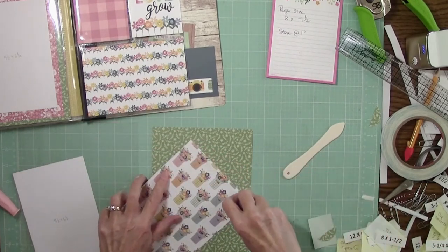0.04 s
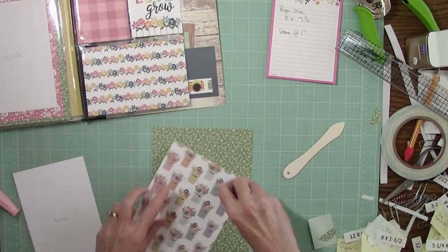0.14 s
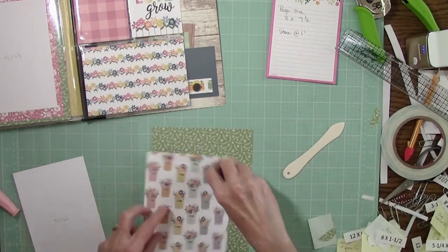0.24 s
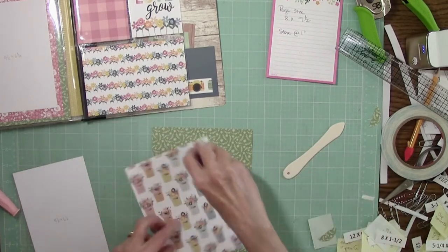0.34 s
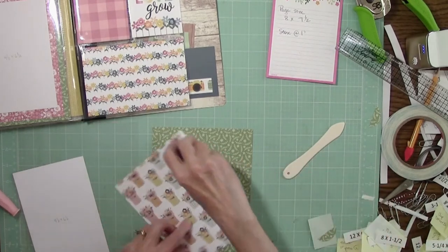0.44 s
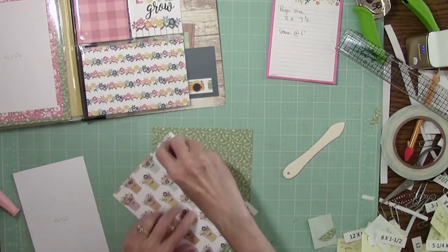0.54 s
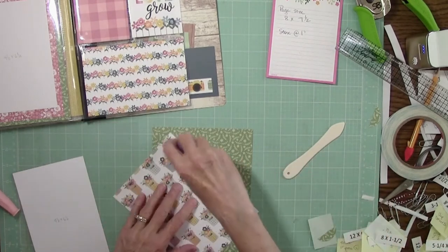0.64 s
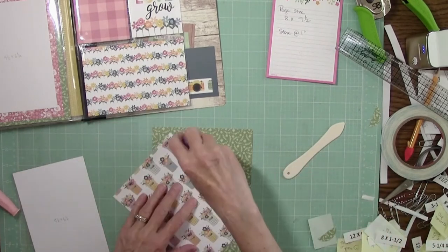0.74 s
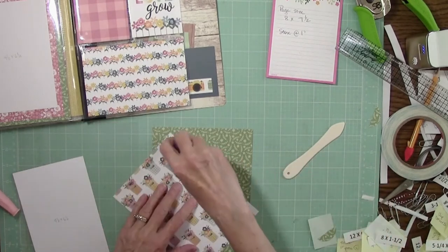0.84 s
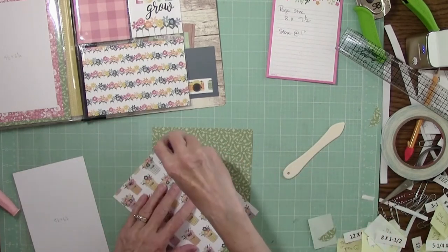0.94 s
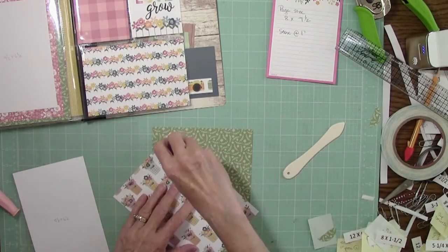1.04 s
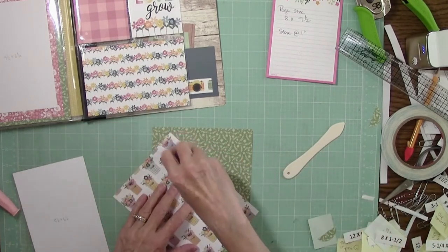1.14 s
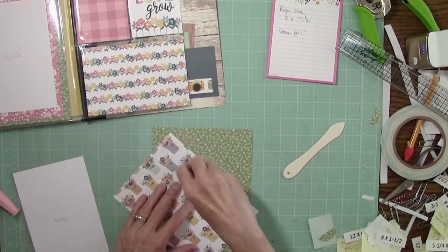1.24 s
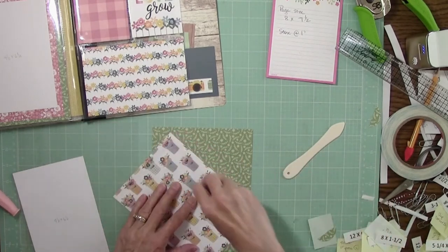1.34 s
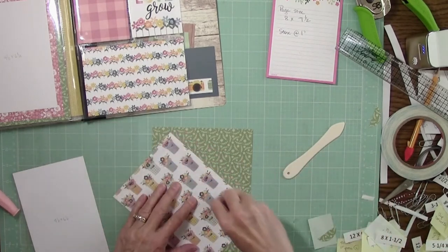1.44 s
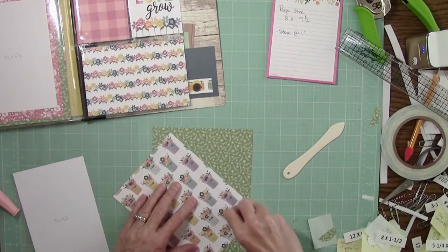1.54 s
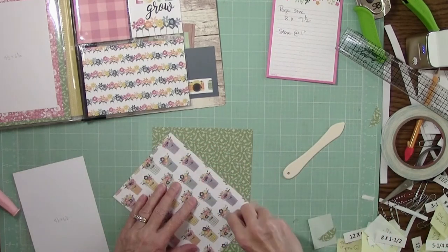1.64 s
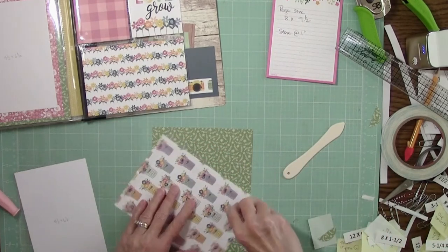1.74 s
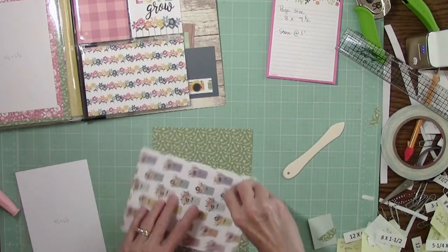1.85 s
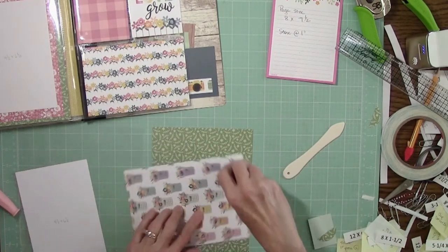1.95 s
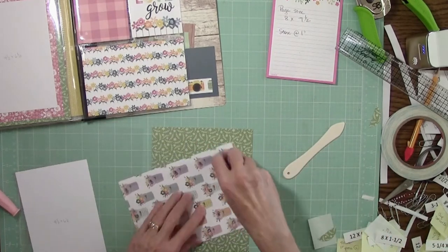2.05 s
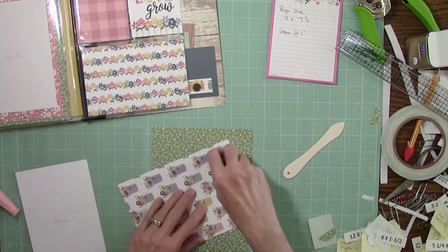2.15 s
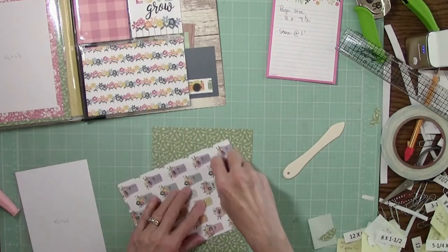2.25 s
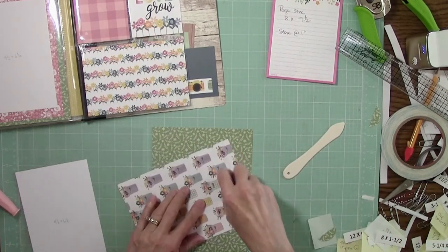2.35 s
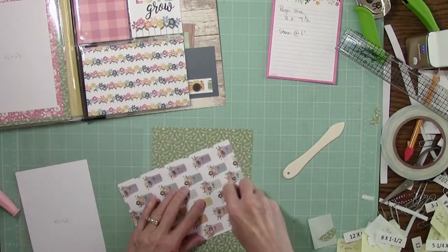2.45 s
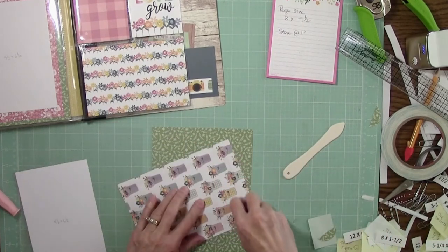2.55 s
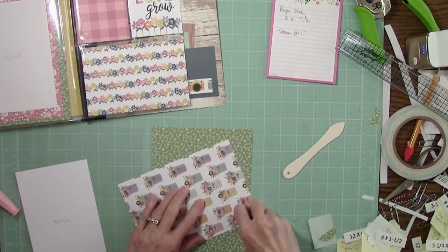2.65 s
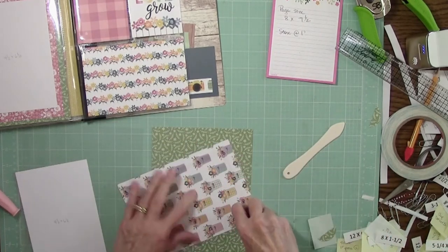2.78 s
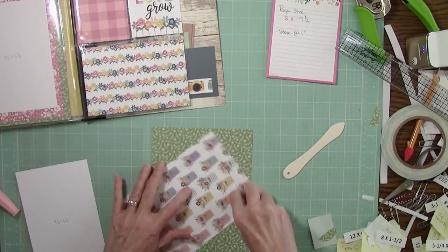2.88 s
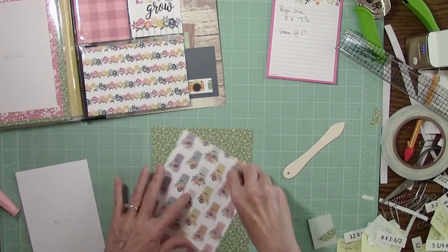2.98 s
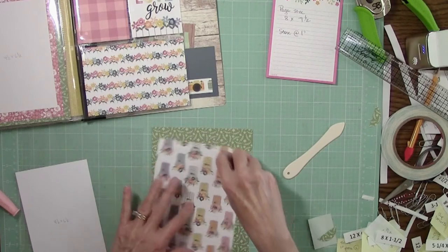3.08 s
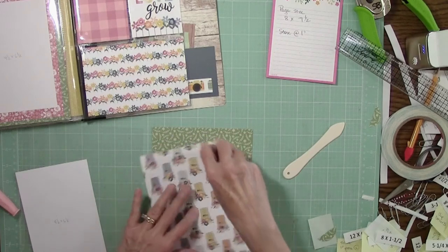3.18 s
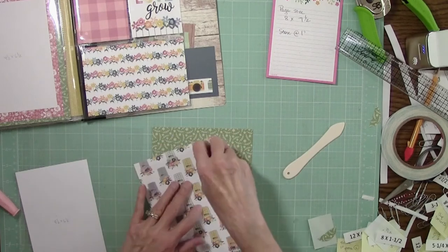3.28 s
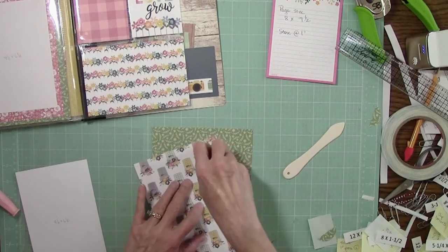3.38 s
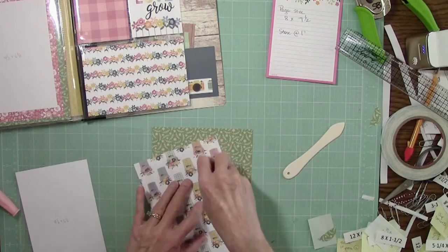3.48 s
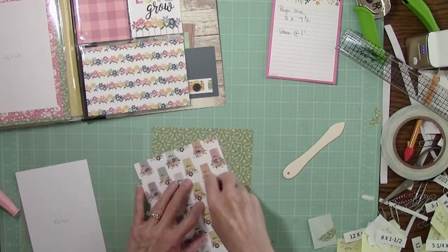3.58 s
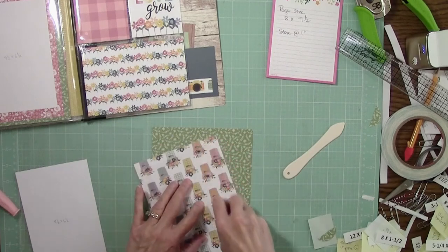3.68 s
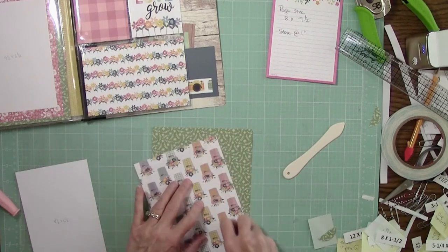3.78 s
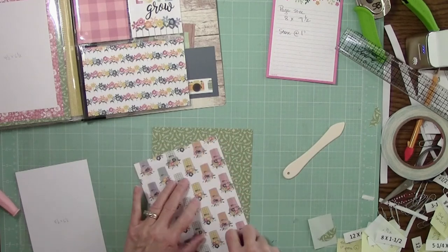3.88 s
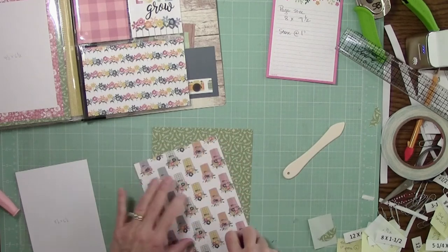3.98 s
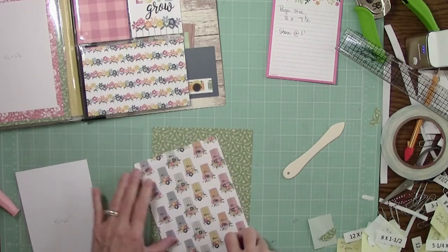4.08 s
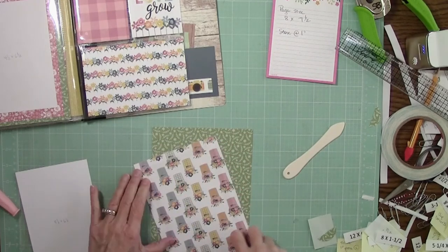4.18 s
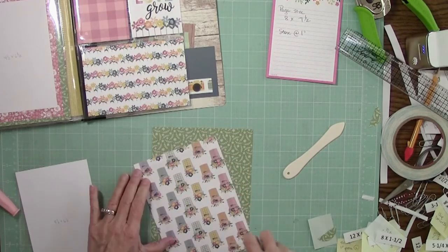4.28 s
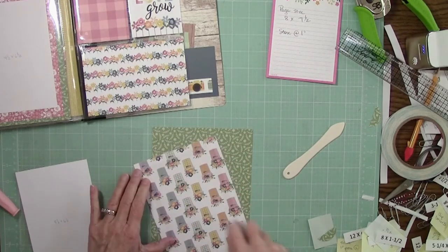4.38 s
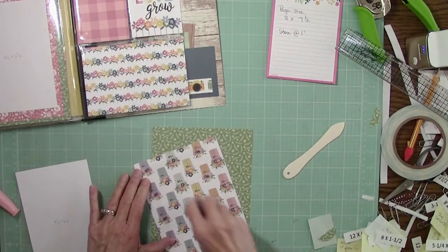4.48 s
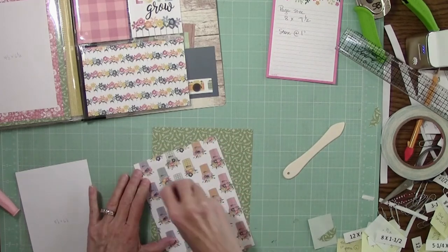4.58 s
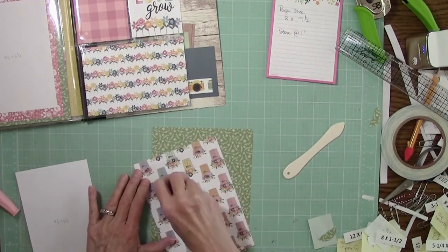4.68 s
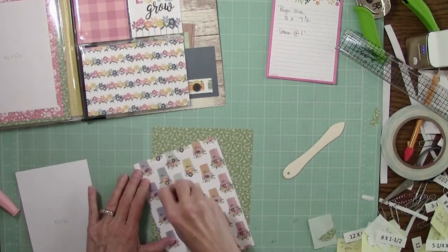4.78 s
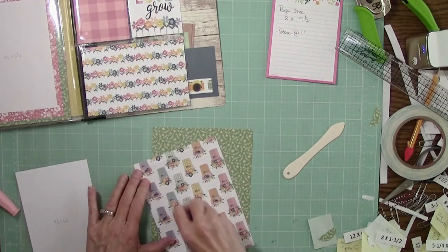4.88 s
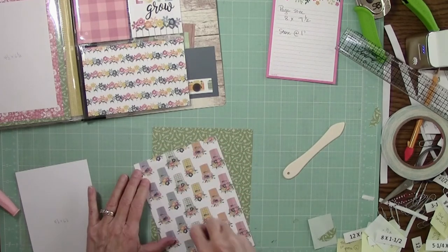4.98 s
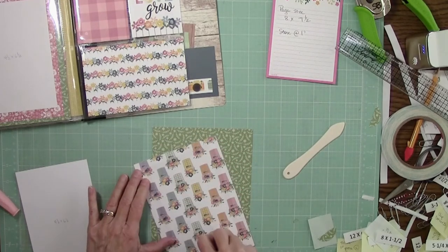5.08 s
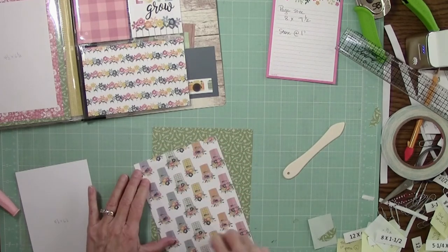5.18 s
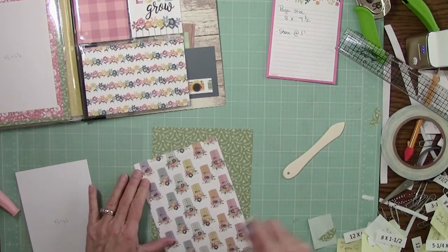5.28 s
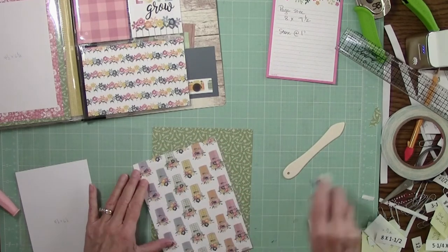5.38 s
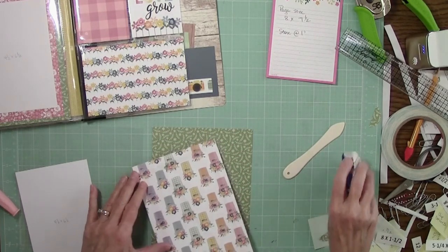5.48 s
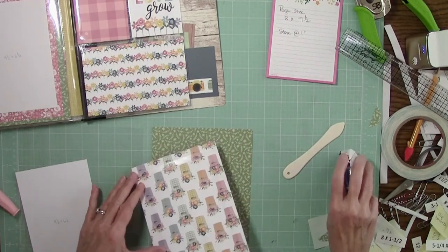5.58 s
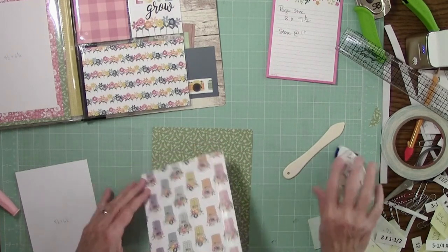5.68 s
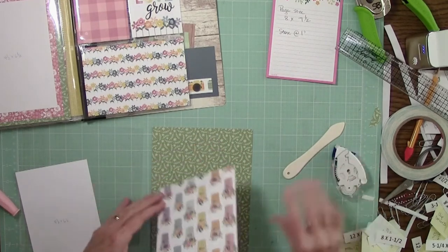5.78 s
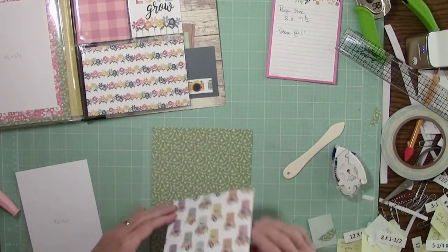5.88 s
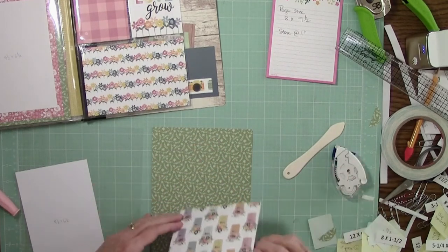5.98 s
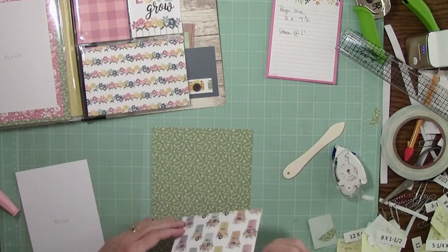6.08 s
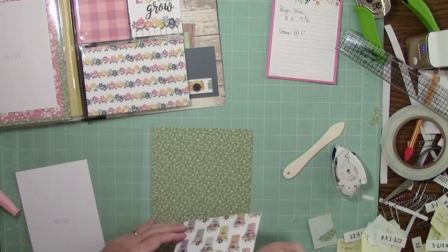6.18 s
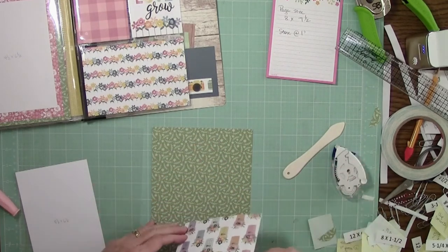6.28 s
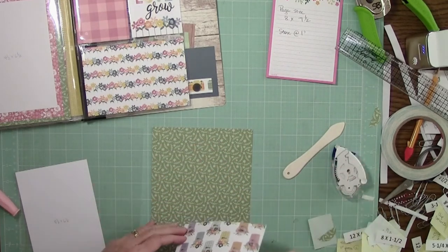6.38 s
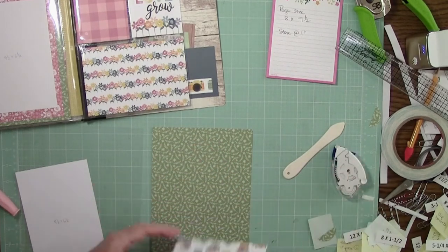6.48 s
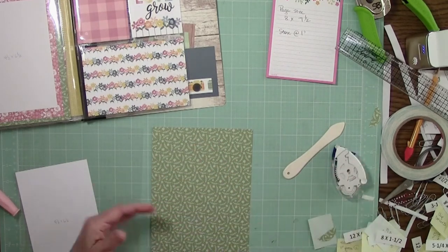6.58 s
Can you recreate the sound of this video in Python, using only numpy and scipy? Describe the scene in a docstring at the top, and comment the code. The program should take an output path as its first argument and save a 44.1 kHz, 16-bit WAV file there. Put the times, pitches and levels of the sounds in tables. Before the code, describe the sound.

A small, quiet room with faint low air and hum, heard close and nearly mono. From 0 to 0.7 s card slides over a mat with soft papery hiss, a sharp tick at 0.3 and smaller ticks. Slight touches at 1.0 lead to the first tape-runner stroke, 1.1-1.65 s: a fast ratcheting buzz, nasal and hollow, rising slightly, with crisp tape peeling above. Card swivels with a bright snap at 1.84 and a hiss. Second stroke 2.25-2.7, a little softer; papery sliding 2.8-3.3 with a snap at 2.95. Third stroke 3.45-3.95 ends in a tooth click. Quieter handling, with clustered ticks at 4.28. Fourth stroke, shorter and stronger, 4.8-5.15, then small ticks. At 5.62 the plastic runner lands with a loud crack and rattle, tipping over with another clack at 5.79. The background then seems slightly subdued; soft contact at 6.16, card knocks at 6.45 and 6.55.

```python
"""Adhesive tape runner on card

A tape runner is drawn four times along the edges of a card on a craft mat; between strokes the card is swivelled.
Ratchet pushes ring the runner's shell resonances; tape peels as filtered clicks; the card hisses, rubs and ticks.
The runner is set down and tips over, then the card is lifted and tapped: noise bursts through crack, rattle,
card and table filters. A small room, faint air and hum, a nearly mono microphone, a slowly recovering limiter.
"""
import sys
import numpy as np
from scipy import signal
from scipy.fft import rfft, irfft
from scipy.io import wavfile
from scipy.ndimage import uniform_filter1d, minimum_filter1d

SR = 44100
rng = np.random.default_rng(int(sys.argv[2]) if len(sys.argv) > 2 else 0)


def unload_wav(signal):
    """Save mono or channel-first audio to the path in sys.argv[1] as 16-bit WAV at rate SR, clipped to [-1, 1]."""
    wavfile.write(
        sys.argv[1],
        SR,
        np.round(np.clip(np.atleast_2d(signal).T, -1, 1) * 32767).astype(np.int16),
    )


N = 292427
T = np.arange(N) / SR

# Levels are at the source, before the output gains and limiter; spectra are relative.
# Half-widths of bell-shaped swells run to 1/e.
# runner strokes: (start [s], run-up [s], slowing from [s], slowing [dB/s], level [dB],
#                  peel over level [dB], main shell resonance at mid-stroke [Hz])
STROKES = [(1.118, .15, 1.601, 135, -25, -4, 1424), (2.235, 0.12, 2.665, 230, -27.5, -3.5, 1400),
           (3.425, .17, 3.92, 173.5, -25, -2.5, 1443), (4.81, .09, 5.115, 222.5, -23, -3.5, 1414)]
# runs of lone ratchet teeth: (first tooth [s], end [s], first gap [s], peak [dB], upper modes over main [dB])
TOOTH_RUNS = [(1.152, 1.196, 0.013, -14.5, 1), (2.257, 2.27, .03, -20, 8), (3.457, 3.51, .0215, -15, 3),
              (3.953, 3.968, .009, -14.5, 9), (5.137, 5.155, 0.013, -28, 1)]
# shell modes above the main one: (centre [Hz], nominal width [Hz], level [dB])
SHELL_MODES = [(1770, 300, -7), (2023, 520, -8), (2660, 370, -5.5), (2720, 260, -4), (3180, 410, 1),
               (3594, 250, -1), (4126, 270, -4.5), (4630, 390, -13.5), (5910, 320, -9), (7540, 300, -8.5),
               (9160, 220, -10.5)]
# main resonance flare-ups: (centre [s], half-width [s], pitch [Hz], level [dB])
SINGS = [(1.183, 0.026, 1347, -28), (1.58, 0.018, 1523, -23), (2.346, 0.038, 1360, -23),
         (2.62, 0.03, 1368, -27.5), (3.874, 0.033, 1503, -24), (4.949, 0.017, 1452, -15.5)]
# nose biting harder: (centre [s], half-width [s], added rasp against the usual [dB])
BITES = [(1.32, 0.057, -14), (2.626, 0.037, -4), (3.55, 0.051, -10), (3.81, 0.061, -2), (5.08, 0.022, -13)]
# peeling tape spectrum: (frequency [Hz], level [dB])
PEEL_SPECTRUM = [(2650, -35.5), (4500, -16), (5300, 0.5), (5810, -12), (6560, 0), (7650, 1), (9360, 1),
                 (14800, -6), (16000, -32)]
# card pushed over the mat: (start [s], run-up [s], slowing from [s], slowing [dB/s], hiss [dB], low rub [dB])
SLIDES = [(-.02, .02, 0.0085, 220, -37.5, -28), (.09, .08, 0.33, 150, -36, -38.5),
          (.27, 0.16, 0.48, 86, -29.5, -37.5), (1.765, 0.066, 1.984, 48, -31.5, -37.5),
          (2.8, .2, 3.32, 241, -35.5, -41.5), (5.31, .1, 5.26, 150, -52.5, -46)]
# paper fibre hiss spectrum: (frequency [Hz], level [dB])
HISS_SPECTRUM = [(2650, -26), (4500, -12.5), (5620, -4), (6770, -2), (7410, -1.5), (7980, -1), (11600, -7),
                 (14000, -15), (15200, -12), (16000, -36.5)]
# sheet rub spectrum: (frequency [Hz], level [dB])
RUB_SPECTRUM = [(290, -34), (500, -4.5), (714, -11), (935, -9), (1720, -0.5), (2140, -2.5), (2800, 2.5),
                (4720, -2), (5000, -11), (6500, -28.5), (11000, -120)]
# squeaks and scuffs of card and fingers:
# (centre [s], half-width [s], pitch [Hz], glide [Hz/s], width [Hz], level [dB])
SCUFFS = [(0.218, 0.04, 2800, -2600, 110, -38.5), (0.402, 0.063, 7540, 0, 400, -27.5),
          (2.877, 0.014, 1680, 0, 900, -38.5), (4.213, 0.0085, 2400, 0, 3530, -34.5),
          (5.586, 0.0039, 1810, 0, 600, -34.5), (5.761, 0.017, 3360, 0, 1610, -28),
          (5.766, 0.0031, 2820, -5, 1300, -18), (6.184, 0.015, 680, -2, 447, -34)]
# card corners, nails, runner's nose touching down: (time [s], peak [dB], centre [Hz])
TICKS = [(0.053, -17, 3270), (0.302, -7, 7000), (0.627, -23, 1440), (0.713, -16.5, 5170),
         (1.0133, -20.5, 2180), (1.0849, -26, 2600), (1.8412, -6, 9700), (2.0448, -12, 3200),
         (2.2473, -11.5, 2770), (2.9493, -11, 9100), (3.43, -18.5, 2800), (4.1639, -24, 6200),
         (4.2706, -12.5, 7200), (4.2774, -16, 6600), (4.2834, -14, 7000), (4.2944, -21.5, 2520),
         (4.734, -20, 1360), (5.2497, -17.5, 1358), (5.3793, -18, 1300)]
# runner landing and tipping over: (time [s], crack [dB], crack decay [s], shell mode [Hz],
#                                   rattle [dB], rattle decay [s], rattle low-pass [Hz], table thud [dB])
DROPS = [(5.6198, 7, 0.0017, 3830, -14.5, 0.053, 8200, -14),
         (5.778, -12.5, 0.0029, 2960, -15, .01, 4000, -65),
         (5.7856, 5, 0.0025, 6750, -4, 0.033, 9500, -22.5), (5.835, -40, .003, 6400, -10, 0.053, 5550, -28)]
# hard plastic crack spectrum: (frequency [Hz], level [dB])
CRACK_SPECTRUM = [(180, -33.5), (300, -26), (870, -17), (2300, -3), (3400, 7), (4300, -12), (5000, -19),
                  (6600, 3), (8000, 1), (11000, -9.5), (16000, -10.5)]
# plastic rattle spectrum: (frequency [Hz], level [dB])
RATTLE_SPECTRUM = [(150, -30), (260, -12), (450, -9), (680, 0.5), (1100, -2.5), (2000, 1.5), (2600, -9.5),
                   (3600, -2), (6400, -9), (10000, -7), (16000, -13)]
# hand and card edge meeting the table:
# (time [s], knock [dB], low-pass [Hz], card flutter [dB], table thud [dB])
KNOCKS = [(1.011, -43, 280, -60, -22), (1.028, -48, 220, -60, -25), (6.164, -27, 9000, -53, -45),
          (6.453, -5.5, 5560, -26, -47), (6.54, -21, 14000, -22.5, -43),
          (6.5532, -6.5, 14000, -22.5, -28.5), (6.573, -29, 1290, -17, -29)]
# card spectrum: (frequency [Hz], level [dB])
CARD_SPECTRUM = [(150, -21), (400, -8.5), (680, 1), (1500, -0.5), (2200, -2), (3400, -2.5), (5000, -11.5),
                 (8300, -6.5), (16000, -27)]
# table-top modes: (centre [Hz], width [Hz], level [dB])
TABLE_MODES = [(151, 100, -6.5), (252, 16, -2.5), (312, 20, -5), (390, 71, -22)]
# room decay: (frequency [Hz], t60 [s])
ROOM_T60 = [(150, 0.76), (600, 0.38), (2000, 0.32), (5000, 0.42), (9000, 0.24), (15000, 0.3)]
# room air spectrum: (frequency [Hz], level [dB])
AIR_SPECTRUM = [(15, -21.5), (25, -4), (123, -5), (263, -6.5), (293, -7), (463, -10.5), (503, -12.5),
                (560, -13), (624, -12), (677, -14), (1560, -14.5), (1700, -15.5), (2690, -19),
                (4490, -22.5), (16000, -33.5)]
# stereo spread of the air: (frequency [Hz], side minus mid [dB])
AIR_SIDE = [(60, -5.5), (110, -4), (200, 1), (380, 2.5), (700, 2.5), (1290, -2), (2380, -8.5), (4400, -11),
            (8120, -4), (15000, -14)]
# mains hum: (frequency [Hz], rms level [dB])
HUM = [(120, -57.5), (240, -58)]

GRIP_HZ_PER_S = 190  # main resonance climbs as the hand leans in
PEEL_SPEED_POWER = 1.29  # peeling dies away sooner than the shell's rasp
CORE_DB, BROAD_DB = -1.5, 4.0  # narrow and broad parts of the main resonance
MAIN_DB, UPPER_DB, DRAG_DB = -4, -0.7, -8  # parts of a stroke, relative to its level
TOOTH_GAP_RATIO = 0.92  # each gap of a run against the one before
SLIDE_FLICKER_DB, SLIDE_PRESSURE_DB = 0.8, 0.5  # rms wander
AIR_DB = -44.5
TOP_HZ = 15900


def runner():
    """Teeth ring the shell and tape peels; a faster stroke is louder and its teeth blur together."""
    speed, rasp, peeling = 0, 0, 0
    main_hz = np.full(N, STROKES[0][-1])
    for start, run_up_s, slow_from, slowing, db, peel_db, hz in STROKES:
        v = hand_speed(start, run_up_s, slow_from, slowing)
        speed = speed + v
        rasp = rasp + undb(db) * v
        peeling = peeling + undb(db + peel_db) * v ** PEEL_SPEED_POWER
        mid_stroke = (start + slow_from) / 2
        main_hz = np.where(T >= start, hz + GRIP_HZ_PER_S * (T - mid_stroke), main_hz)
    tooth_hz = 235 * np.maximum(speed, .05) ** .55
    push = ratchet(tooth_hz, jitter=.12, spread_db=1.5, contact_s=0.0042)

    # main resonance wavers with the grip: narrow singing core in a broader band
    main_hz = main_hz * (1 + 0.014 * walk(20))
    core = moving_ring(push * noise(), main_hz, width_hz=128)
    broad = moving_ring(push * noise(), main_hz, width_hz=417)
    main = even(undb(CORE_DB) * core + undb(BROAD_DB) * broad) * undb(2.9 * walk(24.9))
    sing_s, _, sing_hz, _ = np.transpose(SINGS)
    singing = even(moving_ring(push * noise(), np.interp(T, sing_s, sing_hz), width_hz=72))
    sings = singing * sum(swell(s, half_s, db) for s, half_s, _, db in SINGS)

    # grit under the nose strikes each upper mode unevenly
    upper = 0
    for hz, width_hz, db in SHELL_MODES:
        flicker = undb(db + 3.0 * walk(18))
        strikes = push * grains(rate=3000, spread_db=2.0)
        pass_hz = 1.9 * width_hz  # two wider passes in series
        upper = upper + flicker * unit(ring(ring(strikes, hz, pass_hz), hz, pass_hz))
    upper = even(upper) * undb(1.5 * walk(16))
    bite = 1 + sum(swell(s, half_s, db) for s, half_s, db in BITES)

    # glue lets go of the carrier tape in tiny uneven snaps
    snaps = grains(rate=7100, spread_db=3.0) * (push + .5)
    peel = even(colour(snaps, PEEL_SPECTRUM)) * undb(1.0 * walk(70))
    drag_spectrum = [(100, -3), (400, 3.5), (800, -6.5), (1100, 8.5), (2500, 1.5), (6000, -6.0)]
    drag = unit(colour(noise(), drag_spectrum))
    shell = undb(MAIN_DB) * main + undb(DRAG_DB) * drag + undb(UPPER_DB) * bite * upper
    return rasp * shell + peeling * peel + sings


def ratchet(hz, jitter, spread_db, contact_s):
    """A short scraping push for each tooth of the turning spool."""
    turns = np.cumsum(hz * np.exp(jitter * walk(60))) / SR
    size = undb(spread_db * noise(int(turns[-1]) + 1))[turns.astype(int)]
    since_tooth_s = (turns % 1) / hz
    return unit(size * np.exp(-since_tooth_s / contact_s))


def teeth(count=6):
    """Short runs of lone teeth as the spool turns slowly, each following sooner than the last."""
    out = np.zeros(N)
    for first, end, gap_s, db, upper_db in TOOTH_RUNS:
        gaps_s = gap_s * TOOTH_GAP_RATIO ** np.arange(count)
        times = first + np.cumsum([0, *gaps_s])
        for s in times[times < end]:
            add(out, s, undb(db) * tooth(upper_db))
    return out


def tooth(upper_db):
    """One click of the shell, peak 1; it tugs off a little tape."""
    hit = burst(decay_s=0.0015, size=4096)
    upper = sum(undb(g) * ring(burst(decay_s=0.0023, size=4096), f, w) for f, w, g in SHELL_MODES)
    main = unit(ring(ring(hit, 1330, 220), 1470, 300))
    tape = unit(colour(hit, PEEL_SPECTRUM))
    click = main + undb(upper_db) * unit(upper) + undb(-1.5) * tape
    return click / np.abs(click).max()


def hand_speed(start, run_up_s, slow_from, slow_db_per_s):
    """One push of the hand, 0-1: a smooth run-up times an exponential slowing."""
    run_up = np.sin(np.pi / 2 * np.clip((T - start) / run_up_s, 0, 1)) ** 2
    return run_up * undb(-slow_db_per_s * np.maximum(T - slow_from, 0))


def card_slides():
    """Paper fibres hiss over the mat while the sheet rubs lower down; both follow the hand's speed."""
    hiss = unit(colour(grains(rate=14000, spread_db=3.0), HISS_SPECTRUM))
    hiss = hiss * undb(SLIDE_FLICKER_DB * walk(50))
    rub = unit(colour(grains(rate=7000, spread_db=0.5), RUB_SPECTRUM))
    rub = rub * undb(SLIDE_FLICKER_DB * walk(40))
    pressure = undb(SLIDE_PRESSURE_DB * walk(15))
    slides = 0
    for *push, hiss_db, rub_db in SLIDES:
        slides = slides + hand_speed(*push) * (undb(hiss_db) * hiss + undb(rub_db) * rub)
    return pressure * slides


def scuffs(size=22050):
    """Friction briefly favours one band, swelling and fading; some pitches sink as the sheet slows."""
    out = np.zeros(N)
    for s, half_s, hz, glide, width_hz, db in SCUFFS:
        start = max(s - 3 * half_s, 0)
        since = start + T[:size] - s
        squeak = even(moving_ring(noise(size), hz + glide * since, width_hz))
        add(out, start, undb(db) * squeak * np.exp(-(since / half_s) ** 2))
    return out


def ticks():
    """A caught corner or nail lets go with a dry snap, a bright edge and a short shiver."""
    out = np.zeros(N)
    for s, db, hz in TICKS:
        snap = burst(decay_s=0.0014, size=2048)
        shiver = undb(-13.5) * burst(decay_s=0.0076, size=2048)
        edge = ring(burst(decay_s=0.0026, size=2048), 8400, 7000)
        body = dull(ring(snap + shiver, hz, 0.31 * hz), 11.4 * hz)
        click = unit(body) + undb(-13) * unit(edge)
        add(out, s + .0008, undb(db) * click / np.abs(click).max())  # onset 0.8 ms after table time
    return out


def impacts():
    """Hard plastic cracks on the table and rattles out; hand and card knock and the sheet flutters."""
    out = np.zeros(N)
    for s, crack_db, crack_s, shell_hz, rattle_db, rattle_s, hz, thud_db in DROPS:
        shell = ring(burst(crack_s), shell_hz, width_hz=710)
        crack = undb(crack_db) * (colour(burst(crack_s), CRACK_SPECTRUM) + shell)
        rattle = undb(rattle_db) * dull(colour(burst(rattle_s), RATTLE_SPECTRUM), hz)
        add(out, s, crack + rattle + undb(thud_db) * thud())
    for s, db, hz, flutter_db, thud_db in KNOCKS:
        blow = undb(db) * burst(decay_s=0.0037) + undb(flutter_db) * burst(decay_s=0.014)
        add(out, s, dull(colour(blow, CARD_SPECTRUM) + undb(thud_db) * thud(), hz))
    return out


def thud():
    """The table top answers a blow, swelling briefly before it dies."""
    push = burst(decay_s=0.015) * (1 - np.exp(-T[:SR // 2] / 0.0029))
    return sum(undb(g) * ring(push, f, w) for f, w, g in TABLE_MODES)


def room(x, wet_db):
    """Diffuse reflections build up over a few milliseconds; each band decays at its own rate."""
    t = T[:SR * 3 // 4]
    hz = np.fft.rfftfreq(len(t), 1 / SR)
    spectrum, tail = rfft(noise(len(t))), 0
    for k, (_, t60) in enumerate(ROOM_T60):
        share = on_log_axis([(f, j == k) for j, (f, _) in enumerate(ROOM_T60)], hz)
        tail = tail + irfft(spectrum * share, len(t)) * np.exp(-np.log(1000) * t / t60)
    build_up = 1 - np.exp(-(t / 0.0042) ** 2)
    tail = colour(tail * build_up, [(200, -5.5), (1500, 5), (4000, -2.0), (8000, 0.5), (15000, -7)])
    return undb(wet_db) * signal.fftconvolve(x, tail / np.linalg.norm(tail))[:N]


def background():
    """Steady room air, wide in the bass, and a little mains hum."""
    mid, side = (undb(AIR_DB) * unit(colour(noise(), AIR_SPECTRUM)) for _ in range(2))
    side_gain = undb(on_log_axis(AIR_SIDE, np.fft.rfftfreq(N, 1 / SR)))
    side = irfft(rfft(side) * side_gain, N)
    hum = 0
    for hz, db in HUM:
        hum = hum + undb(db) * np.sqrt(2) * np.sin(2 * np.pi * (hz * T + rng.random()))
    return np.array([mid + hum + side, mid + hum - side])


def undb(db):
    """Decibels to gain."""
    return 10 ** (np.asarray(db) / 20)


def unit(x):
    """Scale to rms 1."""
    return x / np.sqrt(np.mean(x ** 2) + 1e-18)


def even(x):
    """Hold the level at rms 1 over tens of milliseconds; the fast grain stays."""
    return x / np.sqrt(np.abs(uniform_filter1d(x ** 2, size=1500)) + 1e-9)


def noise(size=N):
    """White noise."""
    return rng.standard_normal(size)


def walk(rate):
    """Smooth random wander, rms 1, renewed at a rate in Hz."""
    k = int(SR / rate)
    return unit(uniform_filter1d(np.repeat(noise(N // k + 1), k), k)[:N])


def grains(rate, spread_db):
    """Dense tiny clicks of uneven size, rate per second."""
    sizes = undb(spread_db * np.minimum(rng.exponential(size=N), 5))
    return unit((rng.random(N) < rate / SR) * sizes * np.sign(noise()))


def burst(decay_s, size=22050):
    """Noise that starts at once and dies away; energy is fixed for a given decay."""
    fade = np.exp(-np.arange(size) / SR / decay_s)
    x = noise(size) * fade
    return unit(x) * np.sqrt(np.mean(fade ** 2))


def swell(s, half_s, db):
    """A bell-shaped rise and fall in level."""
    return undb(db) * np.exp(-((T - s) / half_s) ** 2)


def on_log_axis(points, hz):
    """Read (Hz, value) points at any frequency."""
    f, value = np.transpose(points)
    return np.interp(np.log(np.maximum(hz, 1)), np.log(f), value)


def colour(x, points):
    """Causal minimum-phase filter shaped by (Hz, dB) points; white noise keeps its power."""
    size = 4096
    cepstrum = irfft(np.log(undb(on_log_axis(points, np.fft.rfftfreq(size, 1 / SR)))))
    cepstrum[1:size // 2] *= 2
    cepstrum[size // 2 + 1:] = 0
    response = irfft(np.exp(rfft(cepstrum)))
    return signal.fftconvolve(x, response / np.linalg.norm(response))[:len(x)]


def ring(x, hz, width_hz):
    """One resonance, with gain that makes up for its narrow band."""
    b, a = signal.iirpeak(min(hz, .45 * SR), hz / width_hz, fs=SR)
    return signal.lfilter(b, a, x) * np.sqrt(SR / np.pi / width_hz)


def moving_ring(x, hz, width_hz):
    """A steep resonance whose centre moves; rms 1."""
    carrier = np.exp(2j * np.pi * np.cumsum(hz) / SR)
    narrow = signal.butter(2, width_hz / 2, fs=SR, output="sos")
    return unit((signal.sosfilt(narrow, x / carrier) * carrier).real)


def dull(x, hz):
    """Gentle low-pass: a softer contact."""
    return signal.sosfilt(signal.butter(2, min(hz, .45 * SR), fs=SR, output="sos"), x)


def add(out, s, x):
    """Mix a sound in at a time."""
    i = int(s * SR)
    out[i:i + len(x)] += x[:N - i]


def scene():
    """Handwork sits near the middle; impacts reach one microphone port a little earlier."""
    handwork = runner() + teeth() + card_slides() + scuffs() + ticks()
    blows = impacts()
    mid = handwork + blows + room(handwork, wet_db=-9.5) + room(blows, wet_db=-9.0)
    early = undb(-11.5) * np.gradient(blows)  # slope added and subtracted: a tiny time shift
    side = room(handwork + blows, wet_db=-29.5) + early
    return np.array([undb(-4.5) * (mid + side), undb(-4.0) * (mid - side)]) + background()


def limiter(x, ceiling_db, release_db_per_s):
    """Looks a little ahead, turns down for a loud burst and creeps back up."""
    power = np.abs(uniform_filter1d(np.mean(x ** 2, axis=0), size=96))
    loud_db = 10 * np.log10(power + 1e-12)
    needed_db = minimum_filter1d(np.minimum(ceiling_db - loud_db, 0), size=2400)
    recovery_db = release_db_per_s * T
    gain_db = np.minimum.accumulate(needed_db - recovery_db) + recovery_db
    return x * undb(uniform_filter1d(gain_db, size=300))


def record(dry):
    """Limiter, overload at full scale, and the top cut off."""
    x = np.clip(limiter(dry, ceiling_db=-8.0, release_db_per_s=1.1), -1, 1)
    return signal.sosfilt(signal.ellip(10, .2, 80, TOP_HZ, fs=SR, output="sos"), x)


dry = scene()
out = record(dry)
unload_wav(out)
```